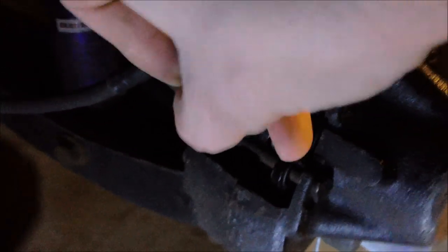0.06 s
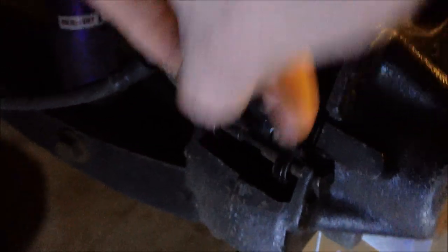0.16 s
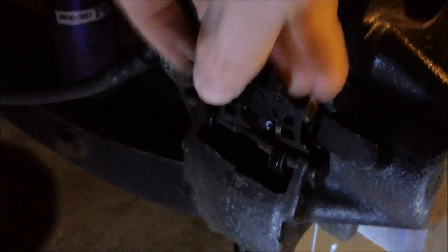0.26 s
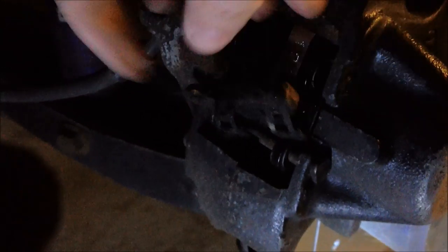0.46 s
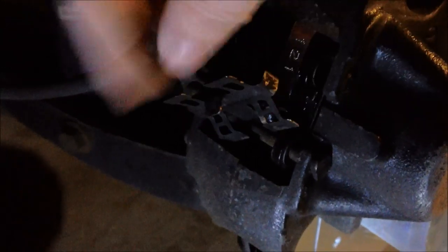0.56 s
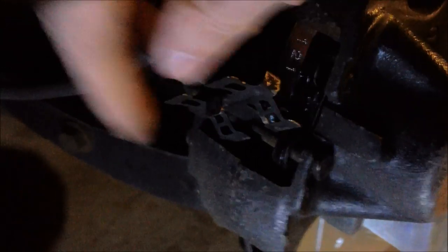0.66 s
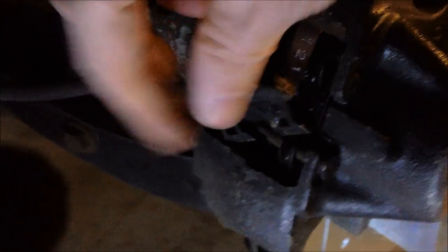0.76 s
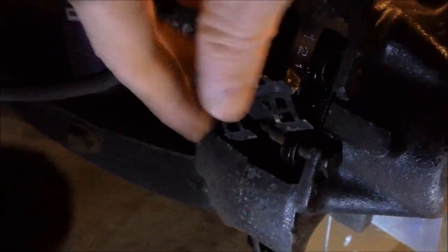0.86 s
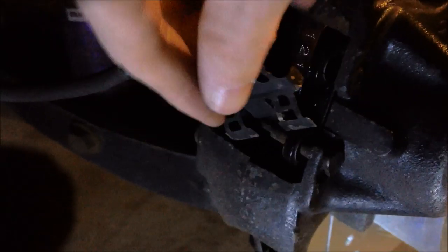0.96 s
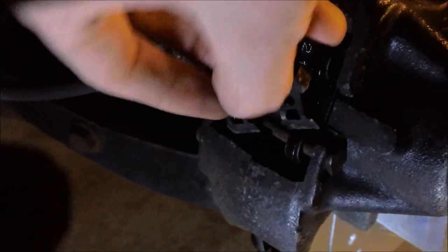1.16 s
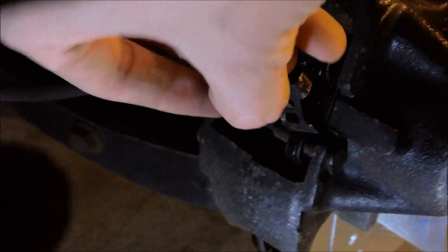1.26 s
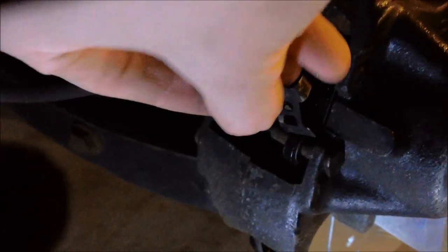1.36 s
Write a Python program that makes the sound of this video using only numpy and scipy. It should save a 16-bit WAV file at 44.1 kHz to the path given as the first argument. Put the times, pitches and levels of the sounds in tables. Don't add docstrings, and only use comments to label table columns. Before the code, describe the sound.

Small metal spring clip handled on a cast brake part, very close, in a quiet garage. Soft skin rubbing and faint taps first; a loud, bright snap at 0.24 s with a short rattle and faint ringing. Light ticks at 0.33-0.41, a cluster from 0.50 ending in a jangle at 0.59, near quiet, a clacking push at 0.89, then faint scrapes, creaks and taps from 1.09 to 1.27.

```python
import sys
import numpy as np
from scipy import signal
from scipy.io import wavfile
from scipy.ndimage import uniform_filter1d

SR = 44100
rng = np.random.default_rng(int(sys.argv[2]) if len(sys.argv) > 2 else 0)


def natural_amplitude(level_db):
    exponent = np.asarray(level_db, float) / 20
    return 10 ** exponent


def output_pcm(signal):
    pcm = np.clip(np.atleast_2d(signal).T, -1, 1) * 32767
    wavfile.write(sys.argv[1], SR, np.round(pcm).astype(np.int16))


N = 61739
T = np.arange(N) / SR

# frequency in Hz, level in dB per Hz.
HUSH_SPECTRUM = [(25, -28), (185, 1), (600, -10.5), (1500, -13), (5000, -16), (9500, -18.5), (13500, -18),
                 (16000, -18)]
# frequency in Hz, level in dB.
MAINS_HUM = [(60, -95.5), (120, -77), (180, -79)]
# time in seconds, level in dB.
FINGER_PRESSURE = [(0, -57.5), (0.101, -57.5), (.16, -59.5), (.23, -63), (.28, -55), (0.428, -55),
                   (.46, -65), (0.497, -64), (.505, -59.5), (.60, -54), (.70, -64.5), (.76, -71),
                   (0.868, -69), (0.899, -60), (1.0, -85), (1.08, -72.5), (1.111, -60.5), (1.3, -70.5)]
# frequency in Hz, level in dB per Hz.
RUB_SPECTRUM = [(88, -28), (150, -1), (637, -6.5), (888, -5), (960, -0.5), (5360, -20.5), (13200, -36.5),
                (15100, -11.5), (16000, -40)]
# start in seconds, length in seconds, level in dB.
STEEL_SCRAPES = [(0.349, .018, -63.5), (1.085, .02, -62), (1.154, 0.011, -69), (1.176, 0.026, -66),
                 (1.22, 0.021, -68), (1.253, .005, -68.5)]
# start in seconds, length in seconds, level in dB, pitch in Hz.
STEEL_CREAKS = [(.8856, .0045, -38.5, 1020), (.905, .03, -58, 711), (1.092, .021, -56, 1010),
                (1.117, .019, -59, 1760), (1.186, .017, -56, 1030), (1.200, .026, -61, 1245),
                (1.266, .028, -63, 1250), (.070, .022, -59, 1200), (.517, .03, -55, 1290),
                (.138, .016, -60, 1900)]
# start in seconds, level in dB.
PIN_KNOCKS = [
    (.10, -75),
    (0.247, -48.5),
    (0.407, -51.5),
    (.512, -52),
    (0.598, -49.5),
    (0.894, -53),
    (1.125, -65),
]
PIN_CHOKED_S = [.24, .36, .445, .56, .87, 1.05, 1.3]
# start in seconds, level in dB, pitch in Hz, t60 in seconds.
KNUCKLE_BUMPS = [(.067, -50, 2450, 0.03), (.139, -54, 2100, .03), (.5395, -50, 3700, .008),
                 (1.1765, -59, 4750, .015), (.070, -54.5, 1190, 0.056), (.502, -50, 480, 0.08),
                 (.501, -56, 2950, 0.024), (.5637, -50, 1900, 0.03), (.8985, -46, 1700, .02),
                 (.9375, -53, 1500, .02), (.2485, -36, 1950, .015), (.568, -51, 456, 0.04),
                 (.578, -46, 1460, 0.027), (.8865, -50, 1700, 0.03), (.8865, -49.5, 403, 0.08),
                 (1.116, -62, 1900, 0.03), (1.178, -58, 2100, 0.03), (1.192, -55, 2000, 0.025),
                 (1.266, -57, 1600, 0.04)]
# frequency in Hz, level in dB, t60 in seconds.
CALIPER_MODES = [(480, 2, 0.071), (730, -16, 0.09), (990, -30.5, 0.038), (1060, -7, .15), (1255, -4, 0.54),
                 (1415, -8.5, .12), (1773, -5, 0.26), (1982, -11.5, 0.43), (2500, -9.5, 0.024)]
# start in seconds, spring level in dB, caliper level in dB,
# pitch region of the spring struck in Hz, chatter length in seconds.
LIGHT_TAPS = [(0.0651, -60, -72, 11800, 0.0073), (0.125, -65, -84, 11100, 0.0014),
              (.1955, -66, -90, 12900, .003), (.334, -53.5, -63, 10800, 0.0053),
              (0.371, -50, -68, 11700, 0.017), (0.369, -55, -64, 6800, 0.0093),
              (0.407, -69, -63.5, 3600, 0.024), (.503, -62, -59, 12200, 0.04),
              (0.505, -61, -67, 8330, 0.046), (0.532, -59, -75.5, 10550, 0.027),
              (0.5393, -54, -74, 3930, .001), (0.5646, -52, -54, 10600, 0.0074),
              (0.5640, -58, -65, 12500, 0.016), (.872, -72, -64, 3230, 0.0049),
              (.981, -67, -77, 12900, 0.039), (.883, -63, -68, 10100, 0.006),
              (1.1764, -59, -68, 4900, 0.003)]
# frequency in Hz, level in dB, t60 in seconds.
LOOSE_MODES = [(3230, -11, 0.072), (3600, -29, 0.45), (4355, -4, 0.067), (6920, -20, 0.08),
               (8430, -10, 0.097), (8220, -8.5, 0.03), (9170, -4, 0.06), (10550, -11, 0.086),
               (11310, -5.5, 0.09), (11640, -3, 0.07), (12390, -8, 0.25), (12750, -18, .15),
               (5676, -22, 0.03), (15250, -13, 0.3)]
# frequency in Hz, level in dB per Hz.
LOOSE_WASH_SPECTRUM = [(180, -72), (300, -8), (892, -9), (1420, -8), (4420, -4), (6460, -7), (11700, -6.5),
                       (13600, -30), (15500, -10)]
# start in seconds, level in dB, wash level in dB, wash t60 in seconds.
JANGLE_BLOW = (.5906, -44, -53, 0.18)
# time in seconds, level in dB against the whole blow.
JANGLE_CONTACTS = [(.5906, -6), (.5917, -1), (.5955, -2), (.6030, -6), (.6066, -3), (.6105, -9)]
# frequency in Hz, level in dB, t60 in seconds.
HELD_MODES = [(491, -17.5, 0.19), (1071, -11, 0.12), (1249, -6, 0.2), (1787, -9, 0.08), (2055, -7.5, 0.044),
              (3233, -12, 0.09), (4420, 2, 0.012), (4660, -2.5, 0.014), (6928, -5, 0.075),
              (7780, -15, 0.03), (10600, -4.5, 0.08), (11570, -13, 0.06), (12400, -6.5, .08),
              (15240, -11, 0.11)]
# frequency in Hz, level in dB per Hz.
HELD_WASH_SPECTRUM = [(180, -54), (300, -3.5), (781, -14), (1150, -3), (2250, -13), (3800, -11),
                      (5760, -16), (8000, -19), (13000, -17)]
# start in seconds, level in dB, wash level in dB, wash t60 in seconds.
SEATING_BLOW = (.8910, -42.5, -50.5, 0.17)
# time in seconds, level in dB against the whole blow.
SEATING_CONTACTS = [(.8910, -8), (.8915, -1), (.8932, -5), (.8986, -8), (.9035, -15), (.9082, -17),
                    (.9120, -22), (.9205, -28)]
SNAP_TIMES_S = [
    .2406,
    .2418,
    .2452,
    .2488,
]
SNAP_LEVELS_DB = [0, -8, -21, -28]
# frequency in Hz, level in dB, t60 in seconds.
TIP_MODES = [(1700, -39, 0.035), (4250, -25, 0.008), (6230, -29, .012), (9700, -21, 0.008),
             (11520, -16.5, 0.0047), (12170, -34.5, 0.0052), (13430, -24, .035), (15304, -30.5, .008)]
# frequency in Hz, level in dB per Hz.
RATTLE_SPECTRUM = [(100, -14), (350, -7), (1000, -24), (1500, 3), (2500, -8), (3500, -3.5), (5400, -18),
                   (13700, -0.5)]
# frequency in Hz, t60 in seconds.
RATTLE_DECAY = [(200, .12), (1500, 0.073), (5000, 0.14), (13000, 0.056)]


def rms_one(x):
    return x / np.sqrt(np.mean(x ** 2) + 1e-20)


def at_hz(points, hz):
    table_hz, values = np.transpose(points)
    return np.interp(np.log(hz), np.log(table_hz), values)


def band(x, low_hz, high_hz):
    return signal.sosfilt(signal.butter(2, [low_hz, high_hz], "band", fs=SR, output="sos"), x)


def bass_cut(x, hz):
    return signal.sosfilt(signal.butter(3, hz, "high", fs=SR, output="sos"), x)


def ring(clicks, hz, t60):
    r = natural_amplitude(-60 / (t60 * SR))
    w = 2 * np.pi * hz / SR
    return signal.lfilter([0, np.sin(w)], [1, -2 * r * np.cos(w), r * r], clicks + 1e-18)


def ring_body(clicks, modes):
    return sum(natural_amplitude(db) * ring(clicks, hz, t60) for hz, db, t60 in modes)


def noise_bands(spectrum):
    edges = 25 * 2 ** np.arange(0, 9.5, 1 / 3)
    centres = np.sqrt(edges[1:] * edges[:-1])
    white = rng.standard_normal((2, N))
    bands = []
    for k, hz in enumerate(centres):
        bands.append(natural_amplitude(at_hz(spectrum, hz)) * band(white[k % 2], edges[k], edges[k + 1]))
    bands = np.array(bands)
    return bands / np.std(bands.sum(axis=0)), centres


def grit(rate, spread_db):
    hits = rng.random(N) < rate / SR
    sizes = natural_amplitude(spread_db * np.minimum(rng.exponential(1, N), 4))
    return hits * sizes * rng.choice([-1, 1], N)


def garage():
    hum = sum(natural_amplitude(db) * np.sin(2 * np.pi * hz * T) for hz, db in MAINS_HUM)
    return natural_amplitude(-68.5) * noise_bands(HUSH_SPECTRUM)[0].sum(axis=0) + hum


def rubbing():
    hiss_db, murmur_db = -1.5, -14
    s, db = np.transpose(FINGER_PRESSURE)
    force = natural_amplitude(np.interp(T, s, db))
    lumps = natural_amplitude(rms_one(band(rng.standard_normal(N), 5.1, 90)))
    hiss = noise_bands(RUB_SPECTRUM)[0].sum(axis=0) * lumps
    grains = grit(2500, 6) * lumps
    even_level = np.std(ring_body(grains, CALIPER_MODES))
    murmur = ring_body(grains * force, CALIPER_MODES) / even_level
    return natural_amplitude(hiss_db) * force * hiss + natural_amplitude(murmur_db) * murmur


def scrapes():
    low_hz, high_hz, edge_s = 11800, 15500, .003
    gate = 0
    for s, length, db in STEEL_SCRAPES:
        rise = (T - s) / edge_s
        fall = 2 * (s + length - T) / length + .5
        gate = gate + natural_amplitude(db) * np.clip(np.minimum(rise, fall), 0, 1)
    bright = band(band(grit(5000, 3.0), low_hz, high_hz), low_hz, high_hz)
    return gate * rms_one(bright)


def creaks():
    rise, glide, rough = .18, .03, .45
    out = np.zeros(N)
    for s, length, db, hz in STEEL_CREAKS:
        gone = (T - s) / length
        size = np.clip(gone / rise, 0, 1) * np.clip(4 * (1.25 - gone), 0, 1)
        size = size * natural_amplitude(db - 5.0 * np.clip(gone, 0, 2))
        out -= size * np.sin(2 * np.pi * hz * length * gone * (1 + glide * (gone - 1)))
    return out * (1 + rough * rms_one(band(rng.standard_normal(N), 40, 400)))


def pin():
    pin_hz, t60_s, rise_s = 894, .5, .005
    size = 0
    for (s, db), end in zip(PIN_KNOCKS, PIN_CHOKED_S):
        gate = np.clip(np.minimum(T - s, end - T) / rise_s, 0, 1)
        size = size + gate * natural_amplitude(db - 60 * np.maximum(T - s, 0) / t60_s)
    waver = natural_amplitude(1.5 * rms_one(band(rng.standard_normal(N), 30.0, 40.2)))
    return size * waver * np.sin(2 * np.pi * pin_hz * T)


def bumps():
    rough_db = 3.0
    out = np.zeros(N)
    white = rng.standard_normal(N)
    for s, db, hz, t60 in KNUCKLE_BUMPS:
        age = T - s
        click = np.zeros(N)
        click[int(s * SR)] = 1
        fall = (age > 0) * natural_amplitude(rough_db - 40 * np.maximum(age, 0) / t60)
        puff = fall * band(white, hz / 1.5, hz * 1.5) * np.sqrt(2500 / hz)
        out += natural_amplitude(db) * (ring(click, hz, t60) + puff)
    return out


def taps():
    spring_grip, caliper_grip = 0.76, .3
    region_octaves, crack_octaves, crack_db = 0.13, 0.77, 13
    s, spring_db, caliper_db, region, length = np.transpose(LIGHT_TAPS)
    chatter = natural_amplitude(-13) * grit(2500, 2.0)
    blows = []
    for start, chatter_s in zip(s, length):
        age = T - start
        blows.append(chatter * (age > 0) * np.clip(1 - (age / max(chatter_s, .001)) ** 2, 0, 1))
    blows = np.array(blows)
    blows[np.arange(len(s)), (s * SR).astype(int)] = 1
    out = np.zeros(N)
    luck_db = 4.5 * rng.standard_normal((len(s), len(CALIPER_MODES)))
    for k, (hz, mode_db, t60) in enumerate(CALIPER_MODES):
        out += ring(natural_amplitude(caliper_db + mode_db + luck_db[:, k]) @ blows, hz, caliper_grip * t60)
    for hz, mode_db, t60 in LOOSE_MODES:
        away_db = 7.6 * (np.log2(hz / region) / region_octaves) ** 2
        out += ring(natural_amplitude(spring_db + .5 * mode_db - away_db) @ blows, hz, spring_grip * t60)
    for blow, db, hz in zip(blows, spring_db, region):
        low_hz, high_hz = hz / 2 ** crack_octaves, min(hz * 2 ** crack_octaves, 15000)
        out += natural_amplitude(db + crack_db) * band(blow + 1e-18, low_hz, high_hz)
    return out


def hard_tap(event, chatter_s, modes, wash, touches):
    touch_spread_db, wash_grain, grain_s = 4.0, 0.5, .0015
    wash_tilt = 0.17
    s, db, wash_db, wash_t60 = event
    age = T - s
    grains = grit(4000, 3.2)
    chatter = natural_amplitude(-16) * grains * (age > 0) * np.clip(1 - (age / chatter_s) ** 2, 0, 1)
    when, touch_db = np.transpose(touches)
    spots = (when * SR).astype(int)
    bands, band_hz = noise_bands(wash)
    luck = rms_one(grains[grains != 0][:len(touches) * len(modes)]).reshape(len(touches), -1)
    rings = 0
    for k, (hz, mode_db, t60) in enumerate(modes):
        blows = chatter.copy()
        sign = np.where(luck[:, k - 1] > 0, 1, -1)
        blows[spots] = natural_amplitude(touch_db + touch_spread_db * np.tanh(luck[:, k])) * sign
        rings = rings + natural_amplitude(mode_db) * ring(blows, hz, t60)
    blows[spots] = natural_amplitude(touch_db)
    crack = natural_amplitude(11) * band(blows, 1500, 11000)
    density = uniform_filter1d(np.abs(grains), size=max(int(grain_s * SR), 1))
    lumps = rms_one(density + 1e-9) ** wash_grain
    speed = (band_hz[:, None] / 4000) ** wash_tilt
    fall = (age > 0) * natural_amplitude(wash_db - 60 * np.maximum(age - chatter_s, 0) / wash_t60 * speed)
    return natural_amplitude(db) * (rings + crack) + lumps * (fall * bands).sum(axis=0)


def snap():
    crack_db, caliper_db, rattle_db = 17, -47.5, -31
    echo_db, echo_t60_s = -24, 0.59
    clicks = np.zeros(N)
    for s, db in zip(SNAP_TIMES_S, SNAP_LEVELS_DB):
        clicks[int(s * SR)] = natural_amplitude(db)
    tip = band(ring_body(clicks, TIP_MODES), 600, .45 * SR)
    crack = natural_amplitude(crack_db) * band(clicks + 1e-18, 11800, 14700)
    knock = natural_amplitude(caliper_db) * ring_body(clicks, CALIPER_MODES)
    bands, hz = noise_bands(RATTLE_SPECTRUM)
    since = T - SNAP_TIMES_S[0]
    age = np.maximum(since, 0)
    dying = natural_amplitude(-60 * age / at_hz(RATTLE_DECAY, hz)[:, None])
    echo = natural_amplitude(echo_db - 60 * age / echo_t60_s)
    rattle = natural_amplitude(rattle_db) * (since > 0) * (bands * (dying + echo)).sum(axis=0)
    return tip + crack + knock + rattle


def scene():
    jangle = hard_tap(JANGLE_BLOW, .021, LOOSE_MODES, LOOSE_WASH_SPECTRUM, JANGLE_CONTACTS)
    seating = hard_tap(SEATING_BLOW, .012, HELD_MODES, HELD_WASH_SPECTRUM, SEATING_CONTACTS)
    steel = rubbing() + pin() + bumps() + taps() + jangle + seating
    mix = garage() + scrapes() + creaks() + bass_cut(steel, 200) + bass_cut(snap(), 150)
    return mix[None]


def band_limit(x):
    return signal.sosfilt(signal.butter(12, 16860, fs=SR, output="sos"), x)


def record(dry):
    def low_pass(hz):
        return signal.sosfilt(signal.ellip(10, .5, 70, hz, fs=SR, output="sos"), dry)

    return band_limit(low_pass(15330) + natural_amplitude(-30) * low_pass(16700))


dry = scene()
out = record(dry)
output_pcm(out)
```